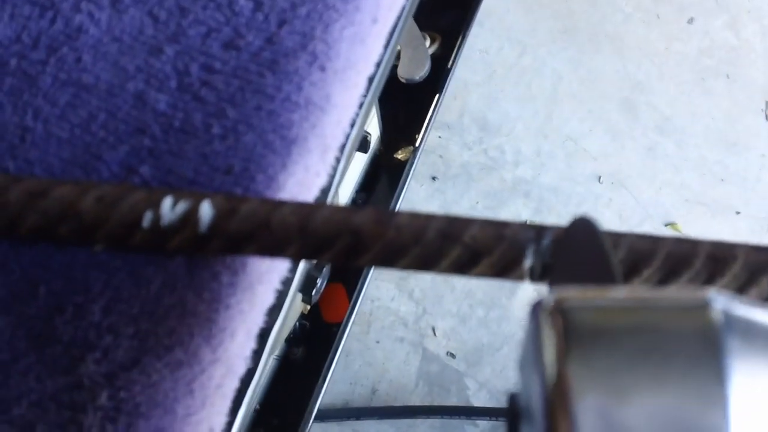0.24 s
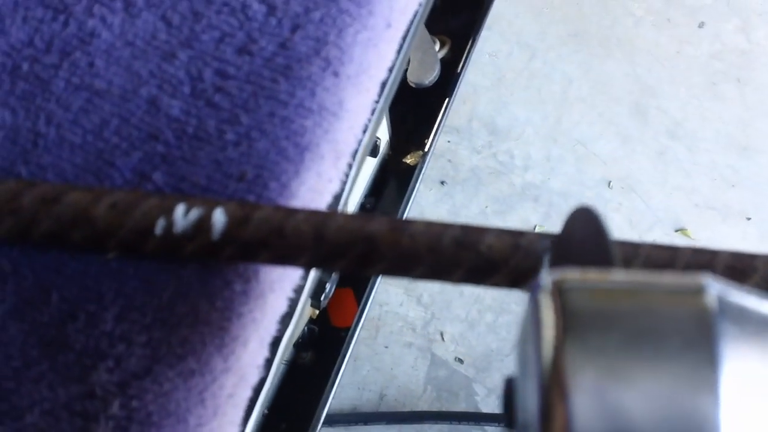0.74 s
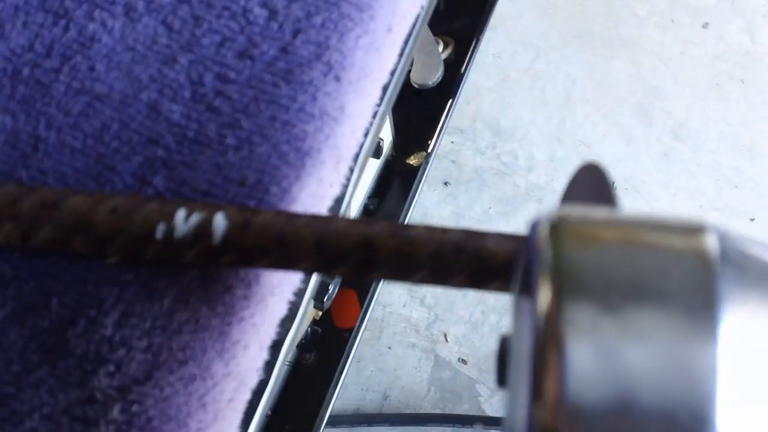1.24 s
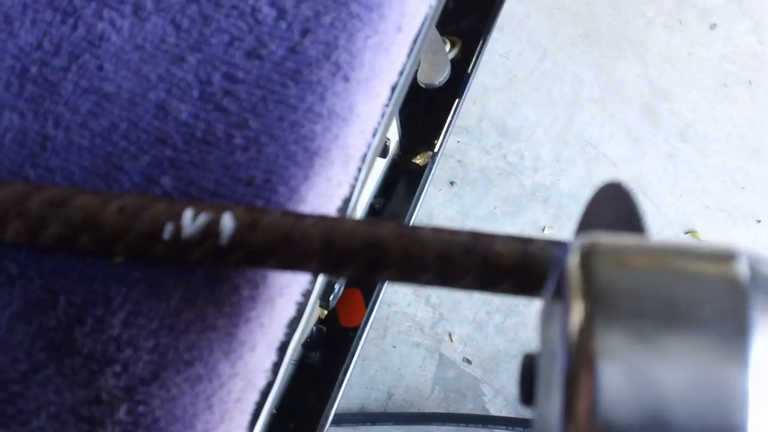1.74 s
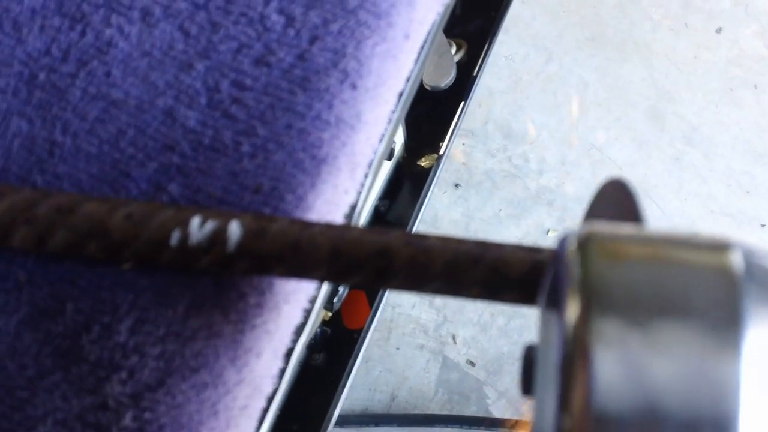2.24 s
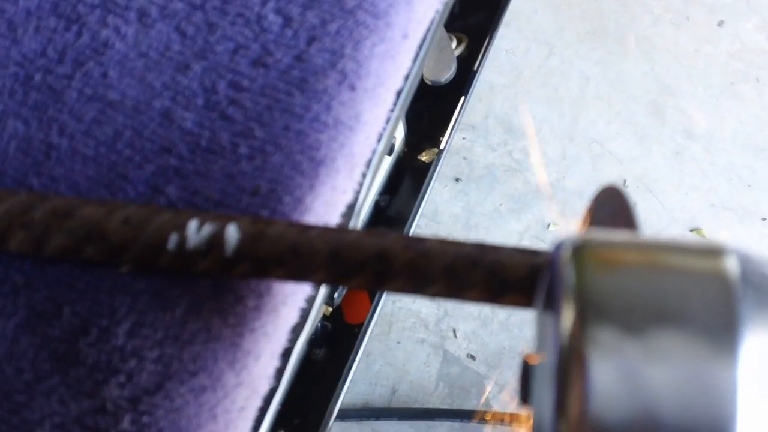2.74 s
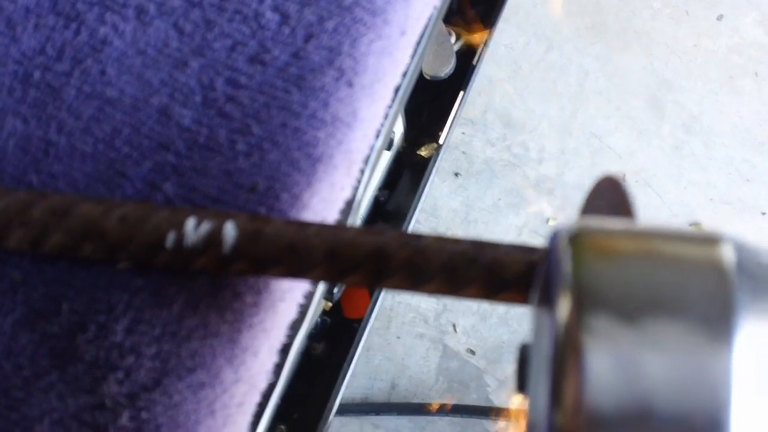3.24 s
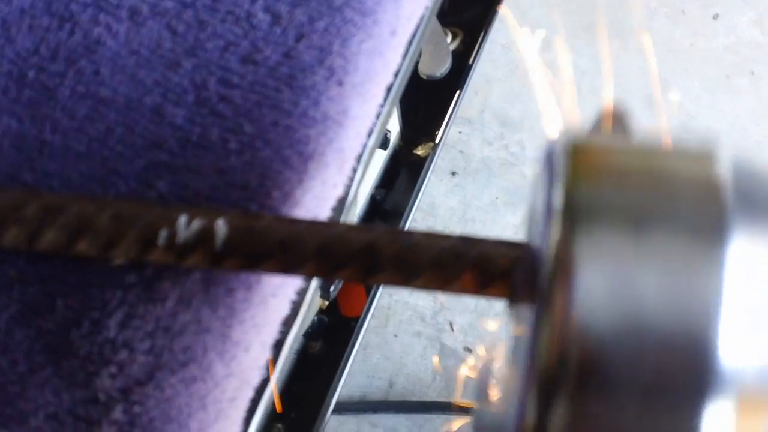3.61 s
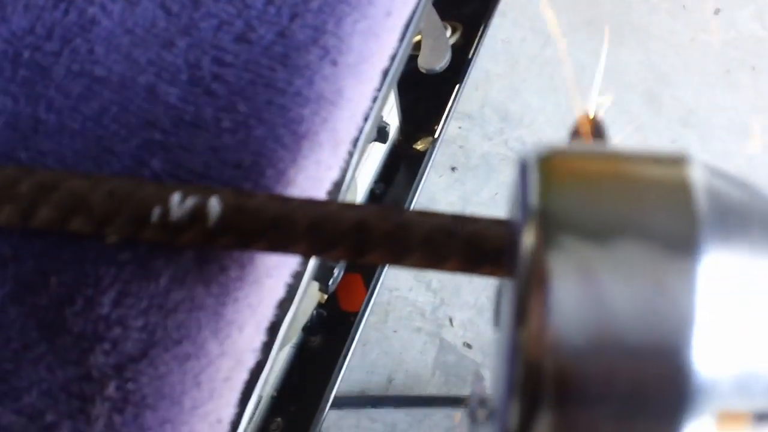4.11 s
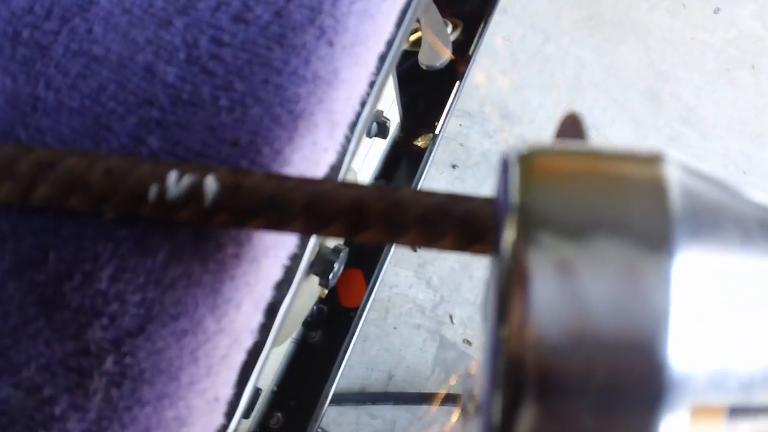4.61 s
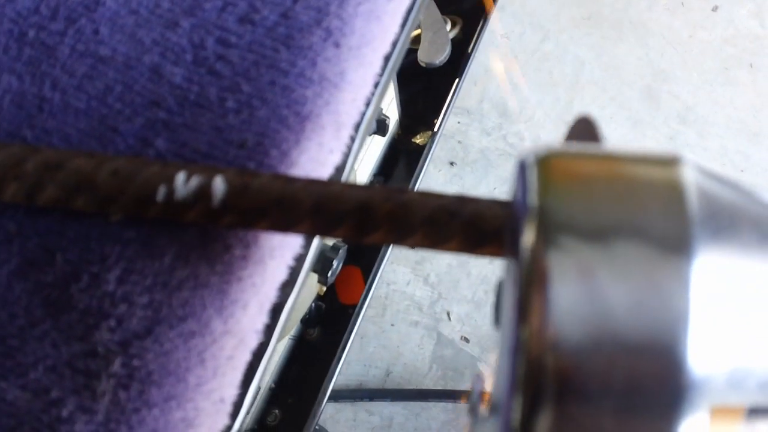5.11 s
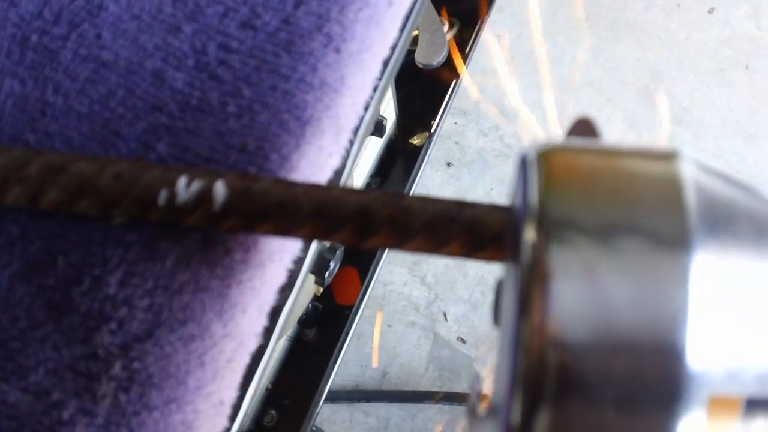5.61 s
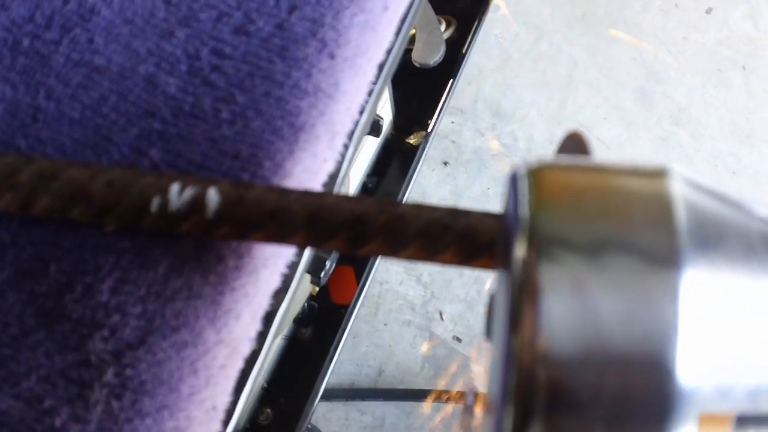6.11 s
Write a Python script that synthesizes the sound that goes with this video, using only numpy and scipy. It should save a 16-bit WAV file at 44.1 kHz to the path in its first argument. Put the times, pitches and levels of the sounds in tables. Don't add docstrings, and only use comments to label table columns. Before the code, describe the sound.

A close, dry, centered sound of an air-powered cutting tool at a workshop bench. From 0 to 2.2 s it spins nearly free: a steady, buzzy high whine with a strong tone near 900 Hz and brighter overtones, wrapped in hissing exhaust, with light scraping touches and small pitch dips around 1.2 s. At about 2.25 s the wheel bites the steel rod; bright ringing and gritty grinding jump forward, the whine sags through 2.6 s, and dull thuds come at 2.4 to 2.8 s. The cut roughens and lowers until 3.6 s. At 3.75 to 3.9 s the wheel jams, pitch plunging, with a metallic rattle and harsh skid, then kicks free and surges up by 4.1 s. From 4.2 s it grinds on, pulsing and ringing with wavering bites, a soft jolt near 5.6 s, the pitch sinking slowly to the end at about 6.35 s, still cutting.

```python
import sys
import numpy as np
from scipy import signal
from scipy.fft import rfft, irfft, next_fast_len
from scipy.io import wavfile
from scipy.ndimage import uniform_filter1d, map_coordinates

SR = 44100
rng = np.random.default_rng(int(sys.argv[2]) if len(sys.argv) > 2 else 0)


def magnitude_from_level(level_db):
    exponent = np.asarray(level_db, float) / 20
    return 10 ** exponent


def waveform_to_disk(signal):
    frames = np.transpose(np.atleast_2d(signal))
    scaled = np.clip(frames, -1, 1) * 32767
    samples = np.round(scaled).astype(np.int16)
    wavfile.write(sys.argv[1], SR, samples)


N = 280228
TIME_S = np.arange(N) / SR


def unit(x):
    return x / np.sqrt(np.mean(x ** 2))


def curves(table):
    start_s, *columns = np.transpose(table)
    return [np.interp(TIME_S, start_s, column) for column in columns]


def bumps(rows, size=lambda v: v):
    return sum(size(v) * np.exp(-.5 * np.square((TIME_S - s) / half_s)) for s, half_s, v in rows)


def walk(rate):
    knots = rng.standard_normal(int(N / SR * rate) + 2)
    return 1.254 * np.interp(np.arange(N) * rate / SR, np.arange(len(knots)), knots)


def colour(x, gain_of_hz):
    size = next_fast_len(N)
    hz = np.fft.rfftfreq(size, 1 / SR) + 1
    return irfft(rfft(x, size) * gain_of_hz(hz), size)[:N]


def ring(force, modes):
    def response(f):
        total = 0
        for k, (hz, width_hz, db) in enumerate(modes):
            total = total + (-1) ** k * magnitude_from_level(db) / (1 + 1j * (f - hz * hz / f) / width_hz) ** 2
        return total
    rung = colour(force, response)
    settle = int(0.073 * SR)
    power = uniform_filter1d(uniform_filter1d(rung ** 2, settle), settle)
    return rung / np.sqrt(power)


# start_s, vane_rate_hz
SPEED = [(0, 932), (.51, 926.3), (.67, 915.6), (1.04, 924), (1.61, 914), (2.25, 913.3), (2.6, 825.7),
         (2.9, 801.3), (3.41, 753.4), (4.3, 766.3), (4.58, 736.2), (4.9, 728), (5.06, 735.4), (5.36, 758),
         (5.52, 742), (5.73, 692.7), (6.17, 687.7), (6.35, 666)]
# start_s, vane_rate_hz
JAM = [
    (3.61, 748),
    (3.75, 712.4),
    (3.8, 584),
    (3.82, 560),
    (3.859, 592),
    (3.899, 635),
    (3.96, 708),
    (4.011, 783),
    (4.101, 792),
]
# middle_s, half_length_s, lost_vane_rate_hz
DRAGS = [(1.19, .07, 30), (1.33, .09, 28), (4.05, .02, 10.5), (4.17, 0.041, 33), (4.47, 0.021, -7.5),
         (4.56, 0.024, 5), (4.68, 0.052, -8.5), (4.84, .02, -7), (4.96, 0.029, -8.5), (5.97, .03, 4.5),
         (6.08, 0.049, -4.5)]


def motor_speed():
    return curves(sorted(SPEED + JAM))[0] - bumps(DRAGS)


def full_load(vane_hz):
    return np.clip((836 + 25 - vane_hz) / 25., 0, 1)


# start_s, pressure_db (as wheel ring), depth in the kerf (0-1)
HAND = [(0, -26.5, 0.36), (.9, -28, 0.2), (2.2, -30, 0.04), (2.26, -15.5, 0.4), (2.45, -16.5, 0.5),
        (2.55, -16.5, .95), (2.9, -14, 0.79), (3.22, -17.5, 0.89), (3.46, -17, 1), (3.6, -19, .95),
        (3.73, -11, 1), (3.9, -15, 0.99), (3.98, -25, 0.66), (4.05, -19, 0.87), (4.3, -16, 0.9),
        (4.6, -18.5, 1), (5.3, -20.5, 0.96), (6.35, -16.5, 0.98)]


def hand():
    return curves(HAND)


def skid():
    middle_s, half_s = 3.88, 0.21
    return np.exp(-np.square(np.square((TIME_S - middle_s) / half_s)))


# middle_s, half_length_s, level_db
JOLTS = [
    (2.42, 0.044, -53),
    (2.58, .03, -57),
    (2.8, 0.11, -47.5),
    (3.53, 0.047, -52),
    (3.79, 0.035, -43),
    (4.13, 0.045, -51),
    (5.6, 0.034, -54),
]


def thuds():
    low = colour(rng.standard_normal(N), lambda f: 1 / (1 + (np.log(f / 120.0) / 0.92) ** 4))
    return bumps(JOLTS, magnitude_from_level) * unit(low)


def air(turns, points, chop, flicker_db):
    point_hz, point_db = np.transpose(points)
    pulse = 1 + chop * np.cos(2 * np.pi * turns)
    noise = rng.standard_normal(N) * pulse * magnitude_from_level(flicker_db * walk(18))
    return unit(colour(noise, lambda f: magnitude_from_level(np.interp(np.log(f), np.log(point_hz), point_db))))


# pitch_hz, level_db (per Hz)
HISS = [(40, -59), (120, -26), (250, -22.5), (800, -19.5), (1600, -10), (2000, -15), (2800, -4.5),
        (4200, -7.5), (5200, -2.5), (6500, -5), (7700, -1.5), (9500, -3), (11500, -12), (15000, -12)]


def hiss(turns, vane_hz, press_db, depth):
    level_db = -24 + 0.25 * depth - 0.2753 * uniform_filter1d(press_db, SR // 4)
    level_db -= 1.5 * full_load(vane_hz)
    return magnitude_from_level(level_db) * air(turns, HISS, .1, .3)


# pitch_hz, level_db (per Hz)
SCRAPE = [(40, -58), (120, -36), (300, -16), (700, -13), (1100, -16), (1600, -11), (2000, -14), (3200, -5),
          (5000, -7), (6800, -11), (8500, -10), (10000, -12), (12000, -13), (15000, -16)]


def scrape(turns, depth):
    level_db = -37.5 + 17 * depth - 0.5 * skid()
    return magnitude_from_level(level_db) * air(turns, SCRAPE, .2, .7)


# middle_s, half_length_s, loss_db
LOOSE = [
    (1.18, 0.053, -9.5),
    (2.45, 0.07, 21),
    (2.8, .09, 11),
    (3.09, 0.039, 11),
    (3.22, 0.064, 3),
    (3.85, 0.063, 15),
    (4.1, 0.036, 6),
]


def throb(turns, depth):
    level_db = -51 + 9.5 * depth - bumps(LOOSE) + 1.8 * walk(14)
    return np.sqrt(2) * magnitude_from_level(level_db) * np.sin(2 * np.pi * turns)


# vane_rate_hz, first_tone_db, second_tone_db, third_tone_db, fourth_tone_db
EXHAUST = [(560, -28.5, -28.5, -27, -54), (612, -28, -30, -33.5, -40), (691, -25, -32, -37.5, -23.5),
           (726, -27, -40, -30, -23), (742.3, -24.5, -27, -31, -23), (782.8, -28, -31, -33.5, -23.5),
           (817, -27.5, -34, -38, -27), (810, -24.5, -33, -35, -36), (822, -27, -31, -48, -20),
           (830, -29.5, -36, -38, -29), (877, -37.5, -29, -25, -27.5), (912, -36.5, -30, -21.5, -26.5),
           (914, -44.5, -30.5, -21.5, -27), (927.4, -31.5, -32, -20.5, -28.5)]


def vane_tones(turns, vane_hz):
    speeds, *levels = np.transpose(EXHAUST)
    flutter_db = 1.5 * (0.37 + 0.34 * full_load(vane_hz))
    out = np.zeros(N)
    for k, tone_db in enumerate(levels):
        share = min(k + .3, 1)
        db = np.interp(vane_hz, speeds, tone_db) + share * flutter_db * walk(12)
        db -= (k > 0) * 3.5 * skid()
        out += np.sqrt(2) * magnitude_from_level(db) * np.sin(2 * np.pi * 4 * (k + 1) * turns + k * k)
    return out


# multiple of shaft rate, free_db, loaded_db
ORDERS_DB = [(2.008, -54.5, -46), (5.03, -48.5, -46), (6.08, -42, -49), (7.004, -37, -51.5),
             (8.84, -49.5, -40), (11.03, -43, -52), (13.88, -31.5, -43.5), (15.31, -40, -36),
             (18.2, -38, -50), (20, -33, -43), (23.13, -35, -53), (24.12, -31, -55)]
# pitch_hz, width_hz, vane_tone_db, between_tone_db (a tone between vane tones)
CASING = [(1205, 40, -50, -41), (1550, 50, -50, -39), (2130, 80, -36, -34), (3290, 45, -36, -29),
          (3960, 110, -40, -33), (4150, 150, -30, -40), (4820, 170, -28.5, -50), (5140, 120, -36, -50),
          (5670, 50, -50, -36), (6030, 110, -29, -44)]


def uneven_tones(turns, vane_hz):
    def tone(order, gain):
        return np.sqrt(2) * gain * magnitude_from_level(0.94 * walk(4.07)) * np.sin(2 * np.pi * order * turns + order * order)
    free_hz, loaded_hz, stall_hz = 922, 836, 612
    load = np.clip((free_hz - vane_hz) / (free_hz - loaded_hz), 0, 1)
    weak = np.zeros(N)
    for order, free_db, loaded_db in ORDERS_DB:
        weak += tone(round(order), magnitude_from_level(free_db + load * (loaded_db - free_db)))
    for order in (7, 9, 10, 15, 19, 20, 21, 22, 25, 28, 30, 32):
        lift = 0
        for hz, width_hz, vane_db, between_db in CASING:
            off = (order * vane_hz / 4 - hz) / width_hz
            lift = lift + magnitude_from_level(between_db if order % 4 else vane_db) / (1 + off ** 4)
        weak += tone(order, load * lift)
    return weak * np.clip((vane_hz - stall_hz) / 60., .1, 1)


def grain_life():
    air_turns, kerf_turns, fresh_turns, skid_turns = 10, 21, 13, 2.8
    enters_s, fresh_s = 2.6, 0.44
    inside = np.clip((TIME_S - enters_s) / 0.23 + .5, 0, 1)
    fresh = fresh_turns * np.exp(-np.maximum(TIME_S - enters_s, 0) / fresh_s)
    life = air_turns + inside * (kerf_turns - air_turns + fresh)
    return skid_turns * (life / skid_turns) ** (1 - skid())


def grit(turns, memory):
    size, count = 256, int(turns[-1]) + 2
    fresh = rng.standard_normal((count, size)) * magnitude_from_level(2.5 * rng.exponential(size=(count, size)))
    keep = np.exp(-1 / np.maximum(np.interp(np.arange(count), turns, memory), .3))
    rim = fresh.copy()
    for k in range(1, count):
        rim[k] = keep[k] * rim[k - 1] + np.sqrt(1 - keep[k] ** 2) * fresh[k]
    rim[:, 0] += 9. * keep ** 2
    press = magnitude_from_level(2.5 * np.cos(2 * np.pi * turns))
    return press * map_coordinates(rim.ravel(), [turns * size], order=3)


# pitch_hz, width_hz, level_db
GUARD = [(3110, 230, 0), (3630, 260, -3)]
# middle_s, half_length_s, level_db
GUARD_BITES = [
    (3.73, .025, -36),
    (3.8, 0.025, -36),
    (3.88, 0.018, -23),
]


def guard(force):
    return bumps(GUARD_BITES, magnitude_from_level) * ring(force, GUARD)


# pitch_hz, width_hz, level_db
RIM = [(10530, 830, 21), (11110, 190, -29)]
# middle_s, half_length_s, level_db
RIM_BITES = [
    (2.5, 0.11, -28),
    (3.62, 0.055, -24),
    (4.12, .08, -28),
    (4.4, .15, -25),
    (5.1, 0.15, -31),
    (6.28, 0.053, -25),
]


def rim_song(force):
    return bumps(RIM_BITES, magnitude_from_level) * ring(force, RIM)


# pitch_hz, width_hz, level_db
ROD_LOW = [(3160, 1140, -10), (3630, 110, -6), (3976, 206, 7)]
ROD_HIGH = [(5500, 208, -1), (5920, 220, -1.5), (6210, 360, 1)]
# middle_s, half_length_s, level_db
LOW_BITES = [(2.55, .07, -31), (3.04, 0.017, -32), (3.46, 0.097, -40), (3.81, 0.04, -24),
             (3.89, 0.014, -44), (4.03, .03, -36), (4.63, 0.057, -31), (5.2, 0.11, -35), (5.46, .03, -26),
             (5.64, 0.1, -28), (6.25, 0.21, -26.5)]
HIGH_BITES = [(2.25, .03, -25), (2.33, .02, -22), (2.55, 0.062, -30), (2.8, 0.13, -27), (2.92, .03, -29),
              (3.46, 0.11, -22.5), (3.59, 0.05, -28), (3.78, 0.047, -24), (3.89, .03, -25),
              (4.13, 0.038, -20), (4.51, 0.047, -26), (4.83, .06, -24), (5.1, 0.11, -26),
              (5.45, 0.037, -36), (5.75, 0.18, -29.5), (6.3, .05, -28)]


def rod(force, press_db):
    low = (magnitude_from_level(press_db - 19.5) + bumps(LOW_BITES, magnitude_from_level)) * ring(force, ROD_LOW)
    high = (magnitude_from_level(press_db - 26) + bumps(HIGH_BITES, magnitude_from_level)) * ring(force, ROD_HIGH)
    return low + high


# pitch_hz, width_hz, level_db
WHEEL = [(7250, 300, -5), (7600, 280, -6), (8100, 340, 0), (8480, 250, -5), (8830, 320, 0), (9120, 180, -6),
         (9650, 300, -10), (10200, 300, -9), (10800, 350, -9), (11400, 400, -10), (13500, 1500, -16)]
# middle_s, half_length_s, level_db
WHEEL_BITES = [(1.07, 0.039, -22), (1.19, 0.03, -22), (2.345, 0.016, -31), (2.74, 0.025, -33),
               (3.04, 0.026, -34), (4.14, .03, -31), (4.83, 0.038, -29), (5.06, 0.043, -27),
               (5.2, .03, -36), (5.46, 0.026, -30), (5.55, 0.029, -31.5)]


def wheel(force, press_db):
    level = magnitude_from_level(press_db + 1.17 * walk(22)) + bumps(WHEEL_BITES, magnitude_from_level)
    return level * ring(force, WHEEL)


def scene():
    vane_hz = motor_speed()
    press_db, depth = hand()
    turns = np.cumsum(vane_hz * (1 + 0.000817 * walk(30)) / 4) / SR
    force = grit(turns, grain_life())
    background = thuds() + hiss(turns, vane_hz, press_db, depth) + scrape(turns, depth)
    motor = throb(turns, depth) + vane_tones(turns, vane_hz) + uneven_tones(turns, vane_hz)
    cut = guard(force) + rim_song(force) + rod(force, press_db) + wheel(force, press_db)
    return np.tile(background + motor + cut, (2, 1))


# middle_s, low_hz, high_hz, level_db
FILLED = [(.128, 4100, 5800, -28), (.244, 5500, 7000, -30), (.66, 11000, 12400, -40),
          (.685, 6900, 8400, -26), (.685, 13100, 14600, -36), (1.195, 4600, 5800, -30),
          (1.22, 12600, 14600, -36), (1.868, 6880, 8420, -26), (2.17, 8150, 10440, -27),
          (2.472, 9100, 10360, -27), (3.262, 8150, 9700, -25), (3.726, 8030, 10380, -22),
          (3.726, 13830, 15200, -36), (4.516, 7500, 8940, -22)]


def flecks():
    out, size = np.zeros(N), 2048
    f = np.fft.rfftfreq(size, 1 / SR)
    for s, low_hz, high_hz, db in FILLED:
        at = int(s * SR) - size // 2
        burst = irfft(rfft(rng.standard_normal(size)) * (f > low_hz) * (f < high_hz))
        out[at:at + size] += magnitude_from_level(db) * unit(burst) * signal.windows.kaiser(size, 5.0)
    return out * np.array([[1], [-1]])


def microphone(x):
    def port(f):
        null = np.abs(f - 12510)
        dip = null / np.hypot(null, 1500.) * null ** 4 / (null ** 4 + 130. ** 4)
        lift = magnitude_from_level(6.0 * np.clip((f - 13300) / 1400., 0, 1))
        rumble_cut = f ** 2 / (f ** 2 + 75. ** 2)
        return dip * lift * rumble_cut * (f < 15310)
    return colour(np.tanh(0.94 * x) / 0.93, port)


def band_limit(x):
    return signal.sosfilt(signal.butter(12, 16660, fs=SR, output="sos"), x)


def record(dry):
    mix = microphone(dry[0]) + flecks()
    return band_limit(mix)


dry = scene()
out = record(dry)
waveform_to_disk(out)
```